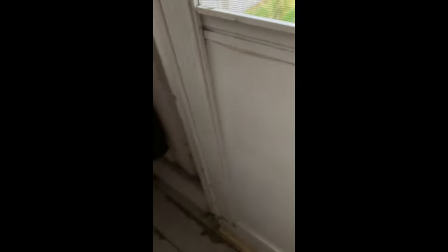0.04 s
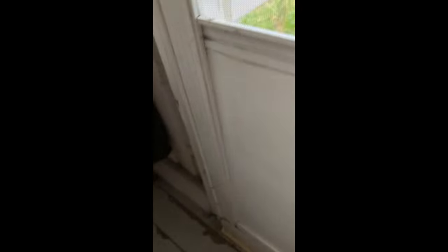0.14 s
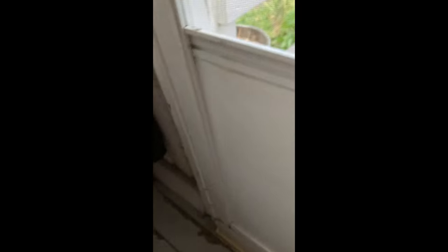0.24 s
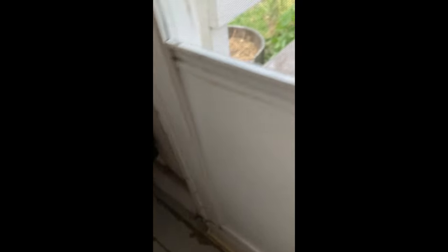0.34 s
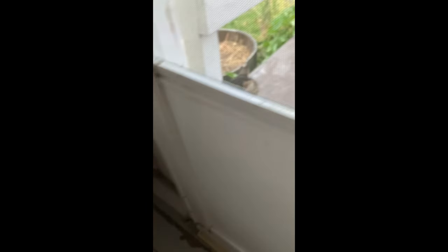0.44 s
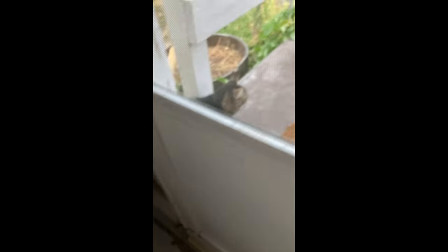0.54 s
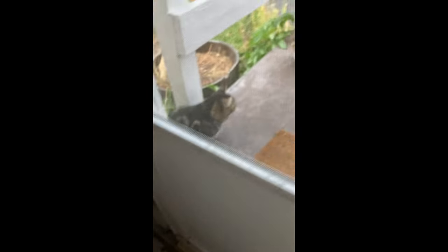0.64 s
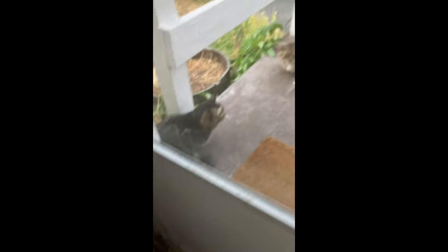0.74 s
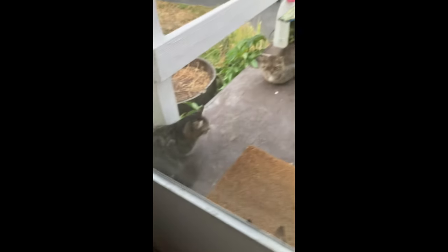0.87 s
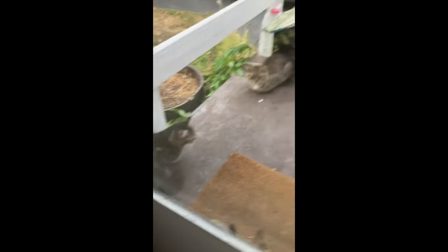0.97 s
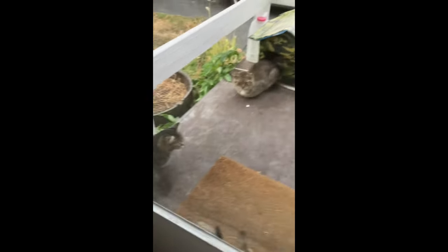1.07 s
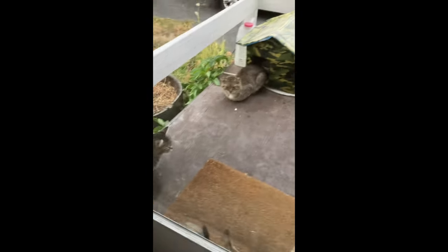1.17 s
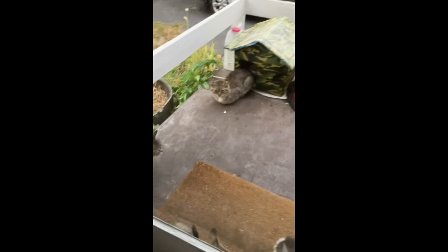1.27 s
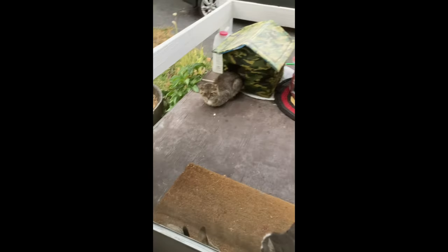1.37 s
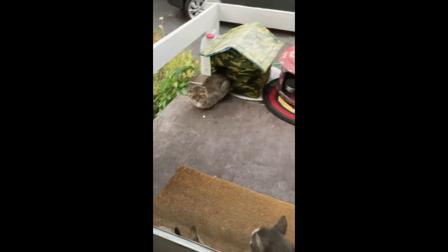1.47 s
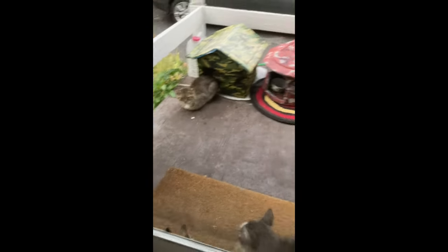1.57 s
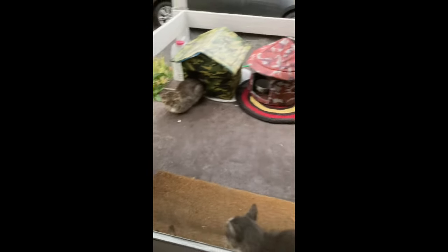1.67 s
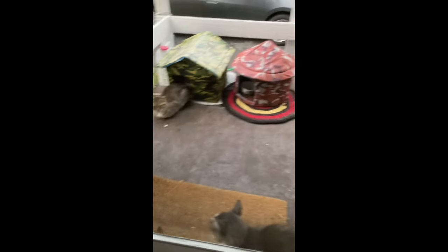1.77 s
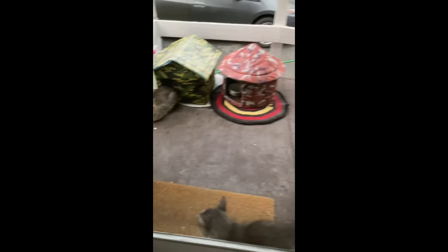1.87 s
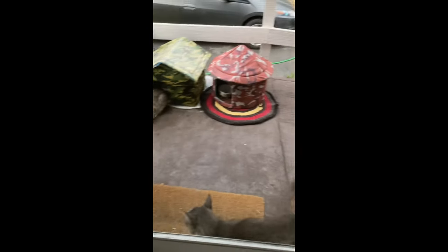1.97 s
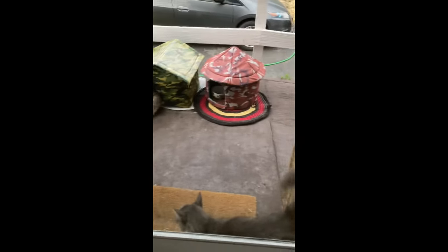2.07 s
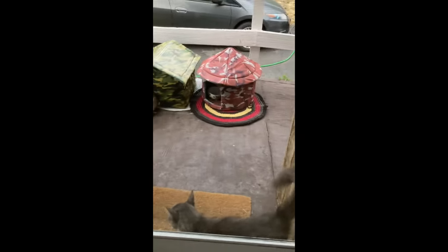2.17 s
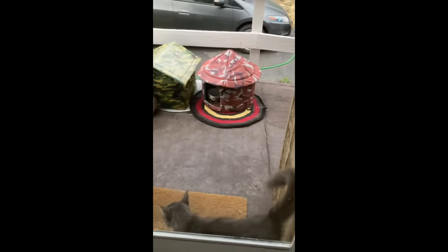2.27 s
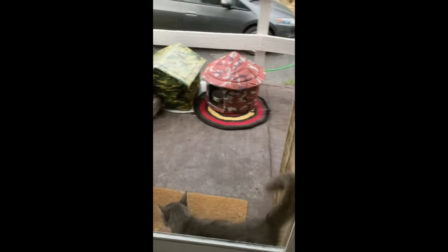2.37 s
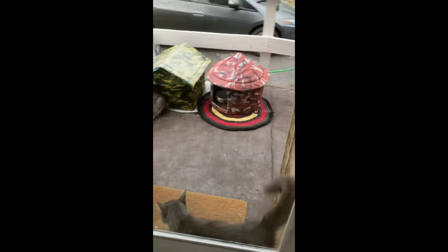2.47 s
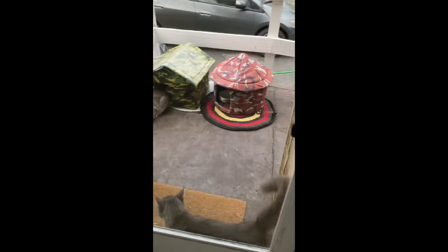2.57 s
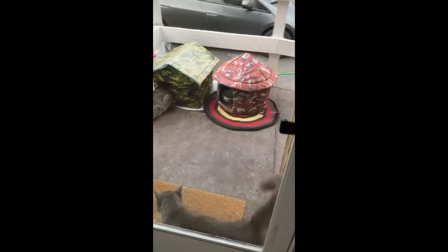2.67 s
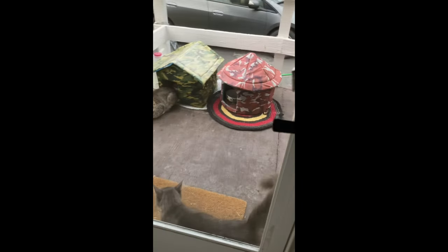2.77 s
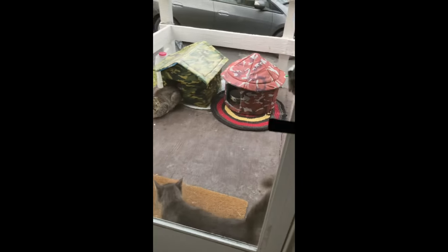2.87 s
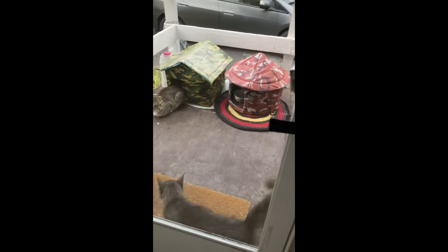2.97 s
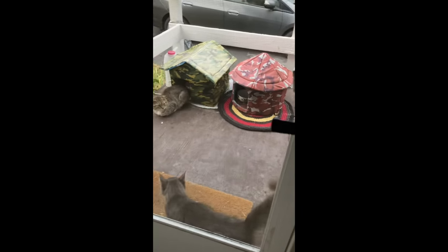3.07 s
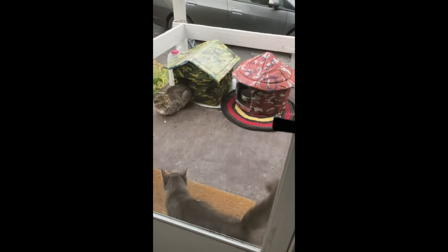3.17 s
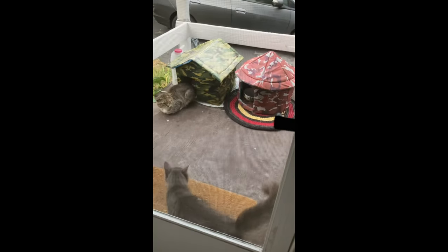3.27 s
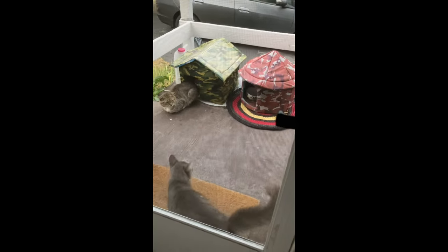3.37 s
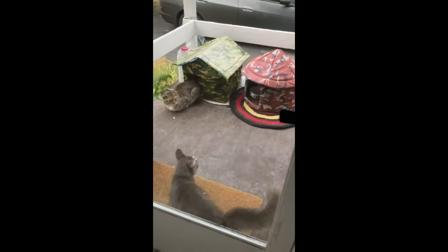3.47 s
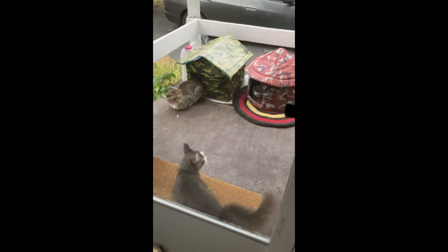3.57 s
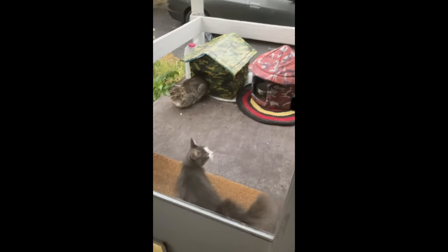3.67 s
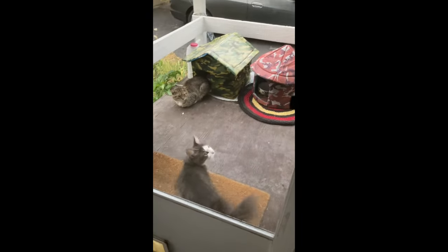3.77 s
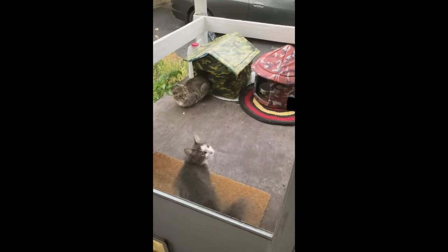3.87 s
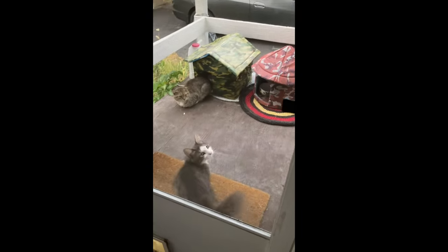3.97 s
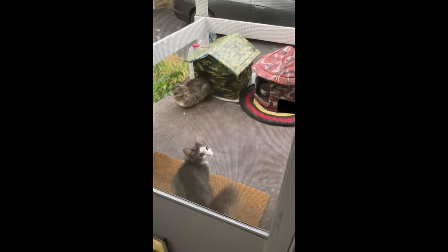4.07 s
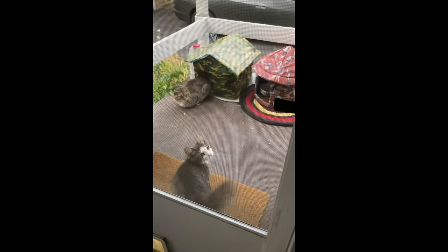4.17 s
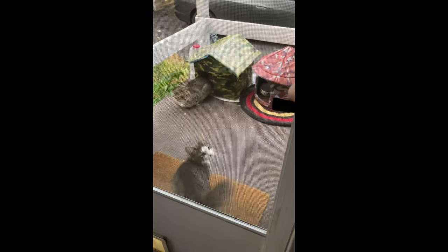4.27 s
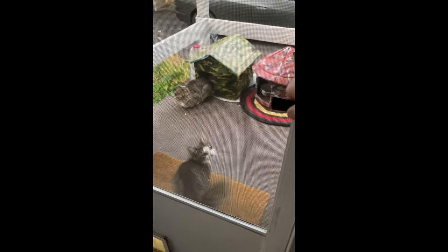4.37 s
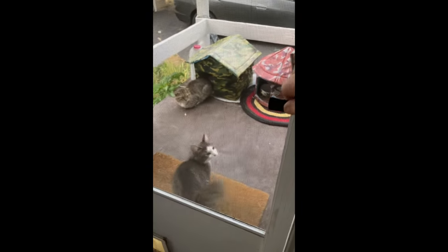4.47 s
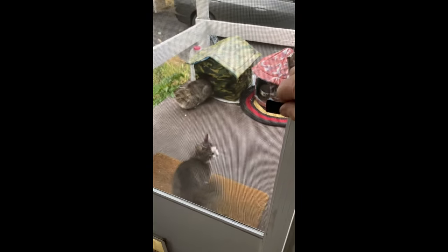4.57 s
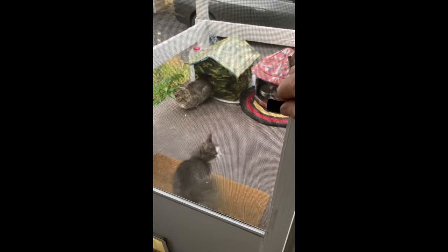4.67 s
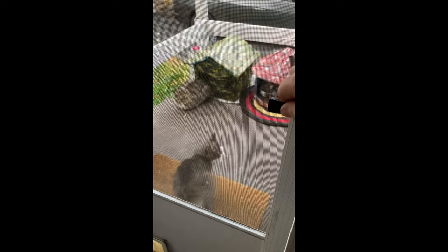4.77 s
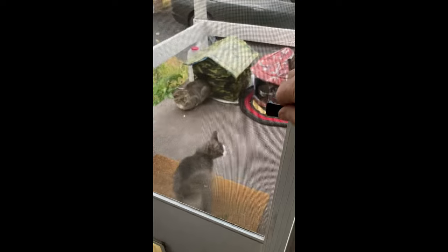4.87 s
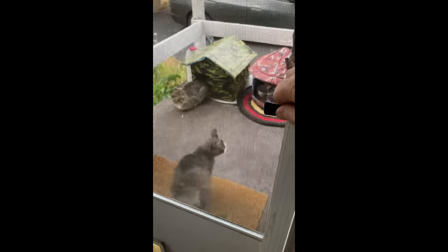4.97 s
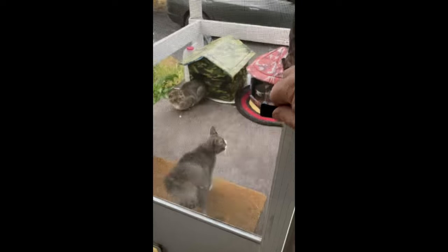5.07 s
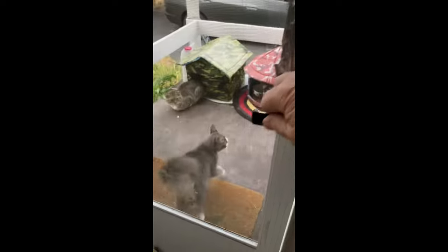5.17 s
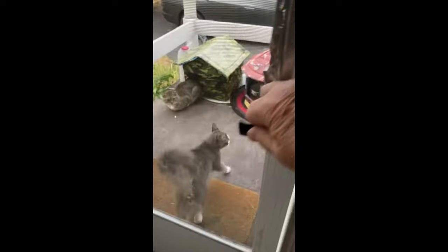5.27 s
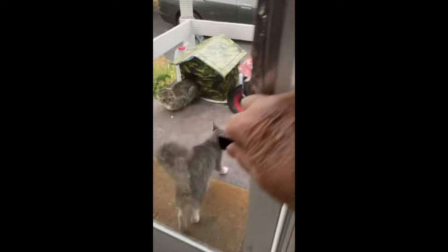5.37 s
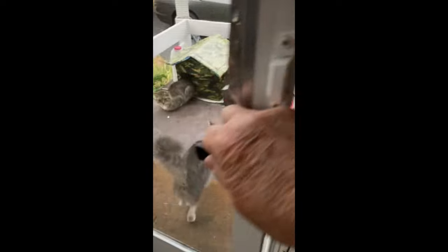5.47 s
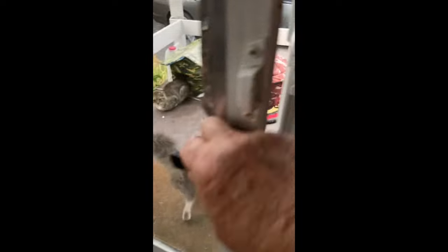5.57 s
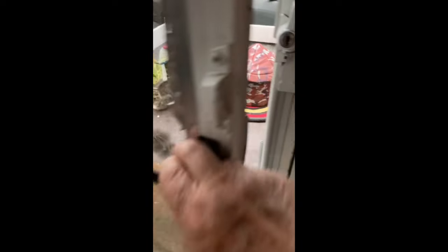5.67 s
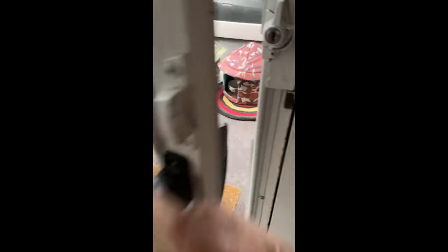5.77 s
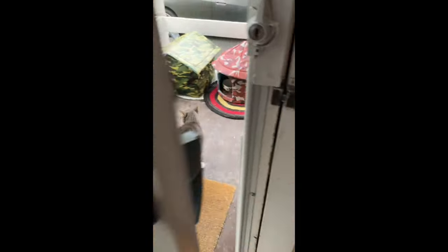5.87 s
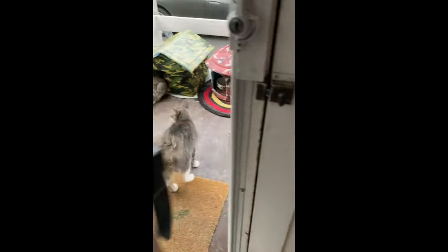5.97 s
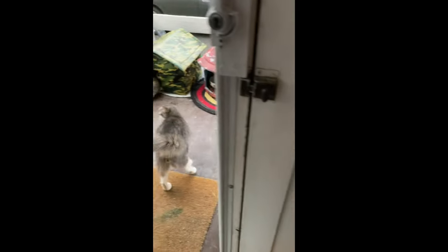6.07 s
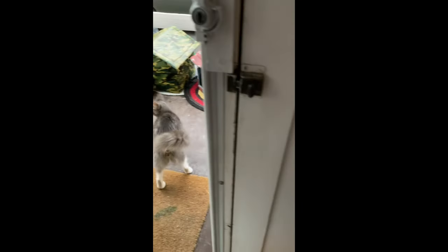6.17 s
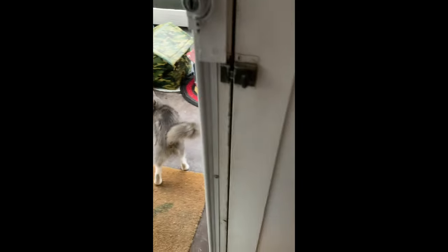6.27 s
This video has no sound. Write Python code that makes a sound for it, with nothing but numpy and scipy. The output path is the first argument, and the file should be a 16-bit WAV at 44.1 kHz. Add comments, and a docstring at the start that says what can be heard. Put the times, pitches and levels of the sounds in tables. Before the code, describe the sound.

A storm door is opened from inside a quiet house entrance, heard close. Faint hum and a far wavering whine lie under a short dragging hiss, scuffing shoes and moving cloth. The door knocks once hard in its frame near three seconds. Later a crisp metallic latch snap is followed by booming pushes, a rough aluminium scrape with a brief squeal, a release clack, then light knocks and rattles, ending in faint rustle and hiss.

```python
"""Opening an aluminium storm door

In a small, quiet entry an appliance hums, a faint whine wavers, clothes rustle and feet scuff and thud.
A door sweep hisses, the door knocks in its frame, the latch snaps, and the edge grinds off the jamb.
Impacts are decaying noise bands and modes; rubs are random slips, coloured and shaped in strokes.
Hum, whine and squeals are unsteady tones; rattles are random taps convolved with a ringing body."""
import sys
import numpy as np
from scipy import signal
from scipy.fft import rfft, irfft
from scipy.io import wavfile
from scipy.ndimage import uniform_filter1d

SR = 44100
rng = np.random.default_rng(int(sys.argv[2]) if len(sys.argv) > 2 else 0)


def dump(signal):
    """Clip the signal to [-1, 1] and save it as 16-bit WAV at the path in sys.argv[1]."""
    limited = np.clip(np.atleast_2d(signal).T, -1, 1)
    pcm = np.round(limited * 32767).astype(np.int16)
    wavfile.write(sys.argv[1], SR, pcm)


N = 278756
TIME = np.arange(N) / SR
AGE = np.arange(SR // 2) / SR  # time since a blow, s


def amp(db):
    """Level law: decibels to amplitude gain."""
    return 10 ** (np.asarray(db) / 20)


def unit(x):
    """Mean power: scales each channel to rms 1."""
    return x / np.sqrt(np.mean(x ** 2, -1, keepdims=True) + 1e-30)


def punch(x, size=400):
    """Short-time power: scales each channel so that its loudest 9 ms have rms 1."""
    power = uniform_filter1d(x ** 2, size, axis=-1)
    return x / np.sqrt(power.max(-1, keepdims=True))


def read(points, hz):
    """Logarithmic pitch scale: interpolates a table along log frequency."""
    f, value = np.transpose(points)
    return np.interp(np.log(hz + 1), np.log(f), value)


def level(rows):
    """Level envelope: gain over time from rows of time and decibels."""
    return amp(np.interp(TIME, *np.transpose(rows)))


def tint(x, colour):
    """Linear filtering: multiplies the spectrum by a colour table."""
    size = x.shape[-1]
    gain = amp(read(colour, np.fft.rfftfreq(size, 1 / SR)))
    return irfft(rfft(x) * gain, size)


def noise(size):
    """White noise: independent random samples in two channels."""
    return rng.standard_normal((2, size))


def band(hz, octaves, slope_db):
    """Dense modes merge into a noise band round hz; its skirts fall by slope_db an octave."""
    away = np.log2((np.fft.rfftfreq(len(AGE), 1 / SR) + 1) / hz)
    skirt_db = -slope_db * (np.hypot(away, octaves) - octaves)
    return unit(irfft(rfft(noise(len(AGE))) * amp(skirt_db), len(AGE)))


def drift(rate):
    """Low-passed noise: smooth random fluctuation of rms 1, turning about rate times a second."""
    lowpass = np.exp(-(np.fft.rfftfreq(N, 1 / SR) / rate) ** 2)
    return unit(irfft(rfft(rng.standard_normal(N)) * lowpass, N))


def dying(t60):
    """Exponential decay: falls by 60 dB in t60 seconds."""
    return np.exp(-np.log(1000) * AGE / t60)


def ring(modes, detune=.002, vary_db=1.4):
    """Modal superposition: the striking point weights the modes afresh for each blow."""
    chance = rng.standard_normal((len(modes), 3, 2, 1))
    total = 0
    for (hz, db, t60), (way, weight, bend) in zip(modes, chance):
        gain = np.sign(way) * amp(db + vary_db * weight)
        total = total + gain * dying(t60) * np.sin(2 * np.pi * hz * (1 + detune * bend) * AGE)
    return total


def add(mix, s, sound):
    """Linear superposition: adds a sound to the mix at time s."""
    part = mix[:, max(round(s * SR), 0):][:, :sound.shape[1]]
    part += sound[:, :part.shape[1]]


def strokes(rows, fall_db_per_s, from_db=-22):
    """Power summation of rubs: each swells from from_db, holds, and fades at a steady decibel rate."""
    power = np.zeros(N)
    for start, swell, hold, db in rows:
        age = TIME[TIME >= start] - start
        rise_db = from_db * np.maximum(1 - age / swell, 0)
        fall_db = fall_db_per_s * np.clip(age - swell - hold, 0, 1)
        power[N - len(age):] += amp(db + rise_db - fall_db) ** 2
    return np.sqrt(power)


def patchy(x, patch_db, patch_s=0.066, patch_hz=450, size=512):
    """Spectral modulation: the colour shifts in patches as the point of contact moves."""
    overlap = size * 3 // 4
    z = signal.stft(x, nperseg=size, noverlap=overlap)[2]
    across = np.fft.fftfreq(z.shape[1], SR / size)
    along = np.fft.fftfreq(z.shape[2], size / 4 / SR)
    across, along = np.meshgrid(across, along, indexing="ij")
    # smooth a random field over frequency and time
    smoothing = np.exp(-(across * patch_hz) ** 2 - (along * patch_s) ** 2)
    field = np.fft.ifft2(np.fft.fft2(rng.standard_normal(z.shape[1:])) * smoothing).real
    return signal.istft(z * amp(patch_db * field / field.std()), nperseg=size, noverlap=overlap)[1][:, :N]


def slipping(slips_per_s):
    """Stick-slip as a random impulse train: tiny slips of uneven size."""
    return noise(N) * (rng.random(N) < slips_per_s / SR)


def friction(pressure, colour, slips_per_s, smooth_db, lumps_db, lump_rate, patch_db=4.0):
    """Dry friction: many tiny slips over a smooth hiss, clumped by uneven pressure."""
    grain = unit(slipping(slips_per_s)) + amp(smooth_db) * noise(N)
    rub = unit(tint(patchy(grain, patch_db), colour))
    return rub * pressure * amp(lumps_db * drift(lump_rate))


def sing(gain, hz, jitter, jitter_rate, flutter_db):
    """Frequency and amplitude modulation: an unsteady thin tone."""
    turns = np.cumsum(hz * (1 + jitter * drift(jitter_rate))) / SR
    return gain * np.sin(2 * np.pi * turns) * amp(flutter_db * drift(8.4))


def resonate(x, hz, width_hz):
    """Moving resonance: a one-pole filter in a frame that turns along the curve hz."""
    turn = np.exp(2j * np.pi * np.cumsum(hz) / SR)
    r = np.exp(-np.pi * width_hz / SR)
    return 2 * (turn * signal.lfilter([1 - r], [1, -r], x / turn)).real


# spectrum of the air noise: frequency_hz, relative_level_db
AIR_COLOUR = [(20, -12.5), (42, -6.5), (58, 11), (80, 1.5), (100, -3.5), (130, -2), (200, -14.5),
              (300, -12), (500, -14.5), (800, -13.5), (1100, -31.5), (1600, -28), (2500, -35.5),
              (5000, -39.5), (15000, -44)]
# slow course of the air noise: time_s, level_db
AIR_LEVEL = [(0, -55.5), (1.4, -56), (2.1, -57.5), (3.3, -59), (4.33, -57.5), (5.5, -51.5), (5.85, -55.5),
             (6.32, -57)]


def background(hum_hz=58.96, hum_db=-53.0, waver_db=-1.16, wander=0.14):
    """Tone plus broadband noise: a wavering appliance hum and fluctuating outdoor air."""
    phase = 2 * np.pi * hum_hz * TIME + wander * drift(12)
    hum = np.sqrt(2) * np.sin(phase) * amp(hum_db + waver_db * drift(3.7))
    air = unit(tint(noise(N), AIR_COLOUR)) * level(AIR_LEVEL) * amp(0.42 * drift(9.0))
    return np.array([hum, np.zeros(N)]) + air  # the hum is alike at both ports


# course of the far whine: time_s, pitch_hz, level_db
WHINE = [(.1, 470, -79), (.42, 500, -62), (.58, 475, -73), (.69, 495, -64), (.83, 460, -72),
         (.94, 500, -65), (1.05, 470, -64), (1.16, 492, -61), (1.33, 478, -62), (1.7, 450, -102)]


def whine(upper_ratio=1.67, upper_db=-6, upper_width_hz=50):
    """Tone and narrow-band noise: a faint far whine rises as it swells, with a weaker fuzzy tone above."""
    s, hz, db = np.transpose(WHINE)
    pitch = np.interp(TIME, s, hz)
    low = sing(0.91, pitch, jitter=0.0207, jitter_rate=60, flutter_db=-1.0)
    upper = unit(resonate(noise(N), pitch * upper_ratio, upper_width_hz))
    return amp(np.interp(TIME, s, db)) * (low + amp(upper_db) * upper)


# moves of a sleeve or trouser leg: start_s, swell_s, hold_s, level_db
RUSTLES = [(-.01, 0.0062, 0.32, -61.5), (.29, 0.045, 0.2, -73), (1.2, 0.028, 0.0074, -57),
           (1.39, 0.024, 0.0078, -62), (1.45, 0.031, 0.017, -58.5), (1.62, 0.098, 0.027, -55.5),
           (1.82, 0.027, 0.041, -56), (2.195, 0.011, 0.079, -61.5), (2.615, 0.008, .24, -66),
           (2.76, 0.0057, .01, -58), (2.885, 0.036, 0.056, -57.5), (4.17, 0.0093, 0.018, -62.5),
           (4.38, 0.076, 0.013, -64), (4.745, 0.029, 0.023, -58.5), (5.47, 0.021, 0.3, -64),
           (6.02, 0.016, 0.016, -58)]
# spectrum of brushing cloth: frequency_hz, relative_level_db
RUSTLE_COLOUR = [(100, 12.5), (500, -3), (1100, -4.5), (2200, 6), (4500, -1.5), (6500, -1.5), (9000, 2),
                 (12000, -4), (16000, -13.5)]


def clothes(crackle_db=-4):
    """Friction of cloth on cloth, with sparse dull crackles where it folds."""
    moves = strokes(RUSTLES, fall_db_per_s=220)
    brush = friction(moves, RUSTLE_COLOUR, slips_per_s=900, smooth_db=5.0,
                     lumps_db=0.3, lump_rate=35, patch_db=2.5)
    fold_colour = [(150, -9.5), (600, 2.5), (2200, -1.5), (6000, -10.5)]  # Hz, dB
    folds = friction(moves, fold_colour, slips_per_s=160, smooth_db=-3.5, lumps_db=-4.5, lump_rate=34)
    return brush + amp(crackle_db) * folds


# soles scuffing on the boards: start_s, swell_s, hold_s, level_db
SCUFFS = [(1.445, 0.025, 0.05, -57), (1.812, 0.0051, 0.0072, -54), (2.21, 0.009, 0.065, -54),
          (2.305, 0.0077, 0.013, -59.5), (4.32, 0.07, .03, -57), (5.56, 0.0085, 0.015, -54.5)]
# spectrum of soles on hollow wood: frequency_hz, relative_level_db
SCUFF_COLOUR = [(40, -6), (100, 13), (200, 2), (450, 4.5), (800, -5), (1400, -3.5), (5000, -20.5),
                (16000, -44)]


def scuffs():
    """Granular friction: a dull drag of soles on hollow wood."""
    return friction(strokes(SCUFFS, fall_db_per_s=171), SCUFF_COLOUR, slips_per_s=1200, smooth_db=2,
                    lumps_db=0.5, lump_rate=69, patch_db=2.0)


# tiny dry ticks of grit underfoot: start_s, level_db
TICKS = [(0.462, -61), (0.5021, -55.5), (0.735, -61), (1.227, -56), (1.422, -58), (1.730, -46.5),
         (1.838, -38.5), (2.091, -54), (5.226, -55)]
# spectrum of a dry tick, also used by the knocks: frequency_hz, relative_level_db
TICK_COLOUR = [(100, -27), (3000, -11), (6000, -11.5), (8500, 1), (13000, -4), (16000, -9)]


def grit(t60=0.011, room_db=-22, room_t60=0.25):
    """Double decay: short bright ticks die fast into a weaker, slower room tail."""
    out = np.zeros((2, N))
    decay = dying(t60) + amp(room_db) * dying(room_t60)
    for s, db in TICKS:
        add(out, s, amp(db) * punch(tint(noise(len(AGE)), TICK_COLOUR) * decay))
    return out


# soft footfalls, dull bumps and pushes on the door: start_s, level_db, centre_hz, swell_s
THUDS = [(.125, -49.5, 318, 0.0031), (0.87, -52, 210, 0.009), (1.519, -45, 120, 0.0083),
         (1.859, -51, 98, 0.016), (2.207, -53, 163, 0.0076), (2.236, -43.5, 118, 0.0043),
         (2.311, -44.5, 118, 0.0051), (2.489, -48, 640, 0.0123), (2.63, -56, 176, 0.0017),
         (2.962, -48.5, 523, 0.0077), (4.431, -51.5, 228, 0.01), (4.759, -41, 194.2, 0.049),
         (4.913, -37, 350, 0.021), (4.931, -37.5, 146, 0.0061), (4.974, -39.5, 54, 0.043),
         (5.026, -46, 126, 0.034), (5.134, -38, 396, 0.0038), (5.15, -41, 148, .008),
         (5.584, -49, 106, 0.016), (6.039, -48, 125, 0.0073)]


def thuds(t60=0.25, t60_slope=0.63, octaves=0.6, slope_db=27, apart=0.18):
    """Frequency-dependent damping: steps, pushes and knocks boom in floor and door, higher ones dying sooner."""
    out = np.zeros((2, N))
    thump_hz, thump_swell_s = 206, 0.0058  # the door leaf's boom after a knock
    thumps = [(s, thump_db, thump_hz, thump_swell_s) for s, _, _, thump_db in KNOCKS]
    for s, db, hz, swell in THUDS + thumps:
        decay = dying(t60 * (thump_hz / hz) ** t60_slope)
        shape = np.minimum(AGE / swell, 1) ** 2 * decay
        add(out, s, amp(db) * punch(band(hz, octaves, slope_db) * shape))
    return out * np.array([[1], [apart]])  # bass reaches both ports nearly alike


# door sweep and soles dragging over the floor: start_s, swell_s, hold_s, level_db
SWEEPS = [(-.01, 0.01, 0.25, -35.5), (.24, 0.016, 0.034, -39), (1.215, 0.022, 0.01, -51.5),
          (1.68, 0.021, 0.014, -54), (1.808, 0.041, 0.025, -42.5), (2.63, 0.033, 0.25, -67),
          (6.04, 0.029, 0.38, -63)]
# spectrum of the sweep's hiss: frequency_hz, relative_level_db
SWEEP_COLOUR = [(100, -0.5), (400, -10), (1000, -14.5), (2500, -17), (4500, -14.5), (7000, -4), (9000, 0.5),
                (13000, 2), (16000, 2)]


def sweep():
    """Fine-grained friction: dense slips make the uneven hiss of the door sweep on the floor."""
    return friction(strokes(SWEEPS, fall_db_per_s=598), SWEEP_COLOUR, slips_per_s=5100, smooth_db=2.0,
                    lumps_db=0.5, lump_rate=76, patch_db=2.0)


# airy squeals: start_s, length_s, level_db, starting_pitch_hz, pitch_jitter (share)
AIRY = [(0.268, 0.29, -69.5, 3900, 0.169), (0.471, .13, -75.5, 3830, 0.028), (4.82, 0.14, -56, 5340, 0.087)]


def squeals(sag_oct=0.12):
    """Pitch glide: each airy squeal swells and fades in one arch; its pitch holds, then sinks."""
    out = np.zeros(N)
    for start, length, db, hz, rough in AIRY:
        part = np.clip((TIME - start) / length, 0, 1)
        pitch = hz * 2 ** (-sag_oct * part ** 4)
        arch = amp(db) * np.sin(np.pi * part)
        out += sing(arch, pitch, jitter=rough, jitter_rate=420, flutter_db=2.5)
    return out


# loose hardware shaking as the door moves: start_s, swell_s, hold_s, level_db
RATTLES = [(4.39, 0.016, 0.098, -56.5), (5.222, 0.0021, 0.0068, -52), (5.297, 0.002, 0.0042, -48),
           (5.357, 0.0039, 0.01, -62.5), (5.43, 0.0095, .01, -53), (5.483, .008, 0.058, -57.5),
           (5.69, 0.022, 0.052, -60), (5.875, 0.0049, 0.017, -65.5)]
# spectrum of the rattling parts: frequency_hz, relative_level_db
RATTLE_COLOUR = [(100, -9), (350, 1), (700, -3.5), (1200, 3.5), (2200, -9.5), (4000, -9.5), (9000, -33.5),
                 (16000, -40)]


def rattle(contacts_per_s=100, spread_db=3, panel_db=-9, t60=0.066, count=4):
    """Impulse response: random taps at a few spots each excite that spot's own dull ring."""
    out = np.zeros((2, N))
    for _ in range(count):
        tapped = rng.random(N) < contacts_per_s / count / SR
        taps = tapped * amp(spread_db * rng.standard_normal(N))
        dull = unit(tint(noise(len(AGE)), RATTLE_COLOUR) * dying(t60))
        body = dull + amp(panel_db) * unit(ring(PANEL))
        out += signal.fftconvolve(taps[None], body, axes=1)[:, :N]
    return unit(out) * strokes(RATTLES, fall_db_per_s=132.5)


# aluminium edge grinding along the strike plate: start_s, swell_s, hold_s, level_db
GRINDS = [(-.01, .01, 0.27, -68.5), (2.905, 0.033, 0.011, -47), (5.035, 0.048, 0.038, -33.5)]
# resonances of the grinding edge: frequency_hz, width_hz, relative_level_db
EDGE = [(1104, 20, -9), (1800, 55, -9.5), (2674, 37, -5.5), (3198, 91, -1.5), (3630, 63, -13),
        (4880, 55, -10), (6220, 45, -11.5), (9500, 190, -13.5)]


def grind(slips_per_s=1400, bend=.012, bend_rate=14, lumps_db=-0.7, lump_rate=90):
    """Driven resonance: quick slips keep the edge ringing; its modes bend as the contact point moves."""
    slips = slipping(slips_per_s)
    shift = 1 + bend * drift(bend_rate)
    metal = unit(sum(amp(db) * unit(resonate(slips, hz * shift, width)) for hz, width, db in EDGE))
    return metal * strokes(GRINDS, fall_db_per_s=298) * amp(lumps_db * drift(lump_rate))


# door edge rubbing on the jamb: start_s, swell_s, hold_s, level_db
SCRAPES = [(-.01, 0.0087, 0.031, -53), (2.9, 0.077, 0.0071, -51), (4.36, 0.029, 0.33, -59.5),
           (4.74, 0.018, 0.05, -45.5), (4.82, 0.088, 0.08, -55.5), (5.012, 0.067, 0.069, -37)]
# spectrum of the scrape: frequency_hz, relative_level_db
SCRAPE_COLOUR = [(30, -21.5), (130, 13), (280, 2), (450, 8), (700, 7.5), (1000, 2), (1500, -1), (2200, 2),
                 (3200, -3), (4500, -4.5), (7000, -11), (9500, -16), (16000, -22)]
# modes of the door panel, also rung by the rattle: frequency_hz, relative_level_db, t60_s
PANEL = [(360.6, -1.5, 0.23), (681, -2, .18), (1088, -6.5, 0.28), (1400, -6, 0.21), (2580, -6, 0.11),
         (3170, -7, 0.12)]


def scrape(free_s=5.13, free_db=-35, free_swell_s=0.014):
    """Stick-slip and release: the edge slips densely on the jamb; the panel rings as it jerks free."""
    rub = friction(strokes(SCRAPES, fall_db_per_s=263), SCRAPE_COLOUR, slips_per_s=1600, smooth_db=-0.5,
                   lumps_db=0.5, lump_rate=170, patch_db=1.4)
    panel = ring(PANEL, detune=0.0017, vary_db=0.5) * np.minimum(AGE / free_swell_s, 1)
    add(rub, free_s, amp(free_db) * punch(panel))
    return rub


def swinging(x, echo_db, delay_s=.0022, sway=.25, sway_rate=3.0):
    """Comb filtering: an echo off the moving door has a swaying delay, so the comb glides."""
    late = TIME - delay_s * np.exp(sway * drift(sway_rate))
    upper = tint(x, [(300, -13), (1200, 2.5)])  # bass bends round the door
    echo = np.array([np.interp(late, TIME, port) for port in upper])
    return (x + amp(echo_db) * echo) / np.hypot(1, amp(echo_db))


def blows(rows, modes, tick_colour, modes_db, octaves, slope_db, crack_t60, tick_t60,
          room_db, room_t60, wood_db, wood_hz):
    """Impact excitation: crack and treble tick die into the small room; the part and wooden jamb respond."""
    out = np.zeros((2, N))
    room = amp(room_db) * dying(room_t60)
    for s, db, hz, tick_db in rows:
        # a soft, low contact cannot reach the high modes
        reached = [(f, d - 10 * np.log10(1 + (f / (2 * hz)) ** 4), t60) for f, d, t60 in modes]
        crack = punch(band(hz, octaves, slope_db) * np.hypot(dying(crack_t60), room))
        body = crack + amp(modes_db) * punch(ring(reached))
        wood = punch(band(wood_hz, octaves=0.37, slope_db=24.0) * dying(t60=0.3))
        tick = tint(noise(len(AGE)), tick_colour) * np.hypot(dying(tick_t60), room)
        add(out, s, amp(db) * (punch(body) + amp(wood_db) * wood) + amp(tick_db) * punch(tick))
    return out


# door knocking in its frame; thuds() plays the low thump: start_s, level_db, centre_hz, thump_level_db
KNOCKS = [(1.474, -59, 900, -56.5), (1.512, -59, 990, -54), (1.633, -56.5, 970, -55.5),
          (1.813, -53.5, 810, -54.5), (2.778, -48.5, 2930, -66), (2.944, -37.5, 2470, -84),
          (2.960, -24.5, 2790, -69), (2.9613, -29, 1950, -52), (3.582, -49.5, 1370, -67),
          (4.394, -38, 1570, -55), (4.907, -56, 960, -45.5), (5.023, -48, 1190, -48.5),
          (5.297, -38.5, 757, -45.5), (5.356, -43.5, 800, -46.5), (5.424, -39.5, 2320, -59),
          (5.456, -60, 1680, -63), (5.572, -49, 1550, -50), (5.704, -52, 1300, -59),
          (5.879, -55, 1235, -55)]
# modes of the frame: frequency_hz, relative_level_db, t60_s
FRAME = [(1090, -10, 0.086), (1448, 5.5, 0.17), (1830, 4, .19), (2080, -3.5, 0.14), (2660, 9, 0.071),
         (3220, -4, .16), (3770, 1.5, 0.12), (4595, 0.5, 0.16), (8010, -4.5, 0.12)]


def knocks(tick_db=-28):
    """Impact on a damped structure: the door strikes its frame, with a treble tick tick_db from the body."""
    contacts = [(s, db, hz, db + tick_db) for s, db, hz, _ in KNOCKS]
    return blows(contacts, FRAME, TICK_COLOUR, modes_db=-11.5, octaves=1.0, slope_db=22.5,
                 crack_t60=0.047, tick_t60=0.012, room_db=-15.5, room_t60=0.24, wood_db=-25, wood_hz=655)


# latch and handle clicks: start_s, level_db, centre_hz, tick_level_db
CLICKS = [(1.004, -60, 2490, -62), (2.206, -59, 1630, -56), (2.632, -64, 3460, -54.5),
          (2.9605, -53, 3000, -34.5), (2.9755, -39.5, 2500, -40), (3.583, -54, 4100, -79),
          (4.182, -55, 3270, -51), (4.510, -47, 1840, -84), (4.5432, -25, 2130, -29),
          (4.547, -39, 2400, -28), (4.757, -75, 2500, -49), (5.127, -33, 2470, -30.5),
          (5.481, -35.5, 3270, -52), (5.701, -48.5, 3490, -68), (5.744, -39, 3400, -64.5),
          (6.040, -59, 2260, -43)]
# modes of the latch: frequency_hz, relative_level_db, t60_s
LATCH = [(1740, 10, 0.043), (2218, 5.5, 0.11), (2604, 1.5, 0.078), (2880, -5.5, 0.19), (3160, 3, 0.17),
         (4050, 3, 0.074), (4650, 5, 0.11), (6800, -7.5, .12), (8250, 1.5, 0.18), (9400, 8.5, 0.071)]
# spectrum of the latch's treble tick: frequency_hz, relative_level_db
LATCH_TICK = [(100, -5), (3000, -12), (6000, 0), (8500, 1.5), (11000, 1.5), (13500, -3.5), (15400, -1.5),
              (16000, -11.5)]


def clicks():
    """Impact of small metal parts: latch and handle snap in a narrow band and ring briefly."""
    return blows(CLICKS, LATCH, LATCH_TICK, modes_db=-4.0, octaves=0.17, slope_db=14.5,
                 crack_t60=0.074, tick_t60=0.0049, room_db=-16, room_t60=0.17, wood_db=-19.5, wood_hz=785)


# echoes off near walls and glass: delay_s, relative_level_db
WALLS = [(.0017, 4.5), (.0031, -5), (.0046, -10), (.0069, -11), (0.015, -8)]


def entry(x, above_hz=900):
    """Early reflections: hard walls close by echo the upper range and comb its spectrum."""
    hz = np.fft.rfftfreq(N, 1 / SR)
    echoes = sum(amp(db) * rng.choice([-1, 1], (2, 1)) * np.exp(-2j * np.pi * hz * s) for s, db in WALLS)
    share = hz ** 2 / (hz ** 2 + above_hz ** 2)
    # echoes colour the sound but keep its mean power
    power = 1 + share ** 2 * sum(amp(db) ** 2 for _, db in WALLS)
    return irfft(rfft(x) * (1 + share * echoes) / np.sqrt(power), N)


# likeness of the two microphone ports, clipped to -1..1 in use: frequency_hz, correlation
LIKENESS = [(100, 0.95), (230, 0.82), (400, 0.52), (620, -0.38), (1000, -0.33), (2800, -0.47), (4000, 0.32),
            (5600, -0.93), (7500, 0.41), (8700, 1), (10000, 0.55), (11400, -1.183), (12400, -0.88),
            (13500, 0.55), (15200, 1)]


def scene():
    """Interchannel coherence: two views of the sounds become sum and difference of two microphone ports."""
    rubbing = swinging(sweep() + clothes() + scrape(), echo_db=-5) + squeals()
    feet = grit() + scuffs() + thuds()  # thuds include the knocks' low thumps
    both = background() + whine() + feet + rubbing + rattle() + grind() + entry(knocks() + clicks())
    like = np.clip(read(LIKENESS, np.fft.rfftfreq(N, 1 / SR)), -1, 1)
    mid, side = irfft(rfft(both) * np.sqrt([(1 + like) / 2, (1 - like) / 2]), N)
    return np.array([mid + side, mid - side])


def record(dry):
    """Port balance and band limit: left has more bass and less near 600 Hz, right the reverse."""
    lean = tint(dry, [(300, 0.88), (600, -0.42), (1200, 0)]) - dry
    ports = dry + np.array([[1], [-1]]) * lean
    lowpass = signal.firwin(401, 16000, window=("kaiser", 8), fs=SR)  # cutoff in Hz
    return signal.oaconvolve(ports, lowpass[None], "same", axes=1)


dry = scene()
out = record(dry)
dump(out)
```